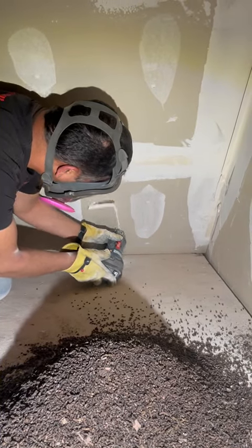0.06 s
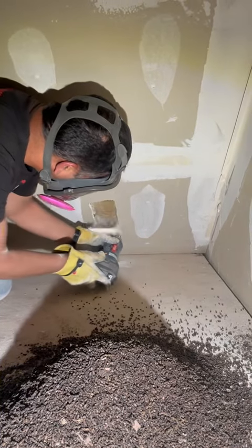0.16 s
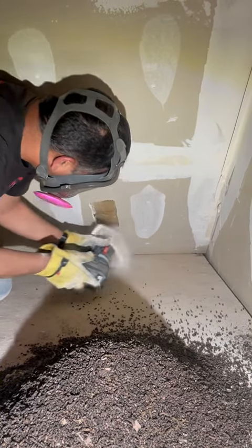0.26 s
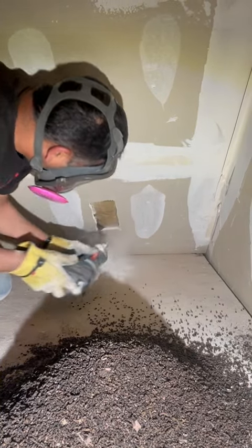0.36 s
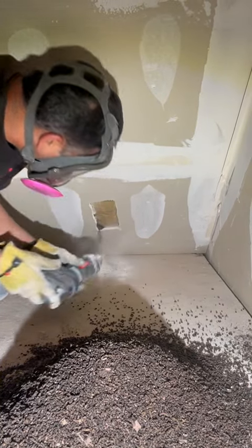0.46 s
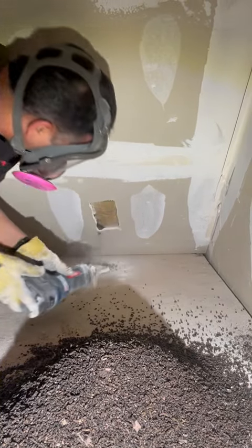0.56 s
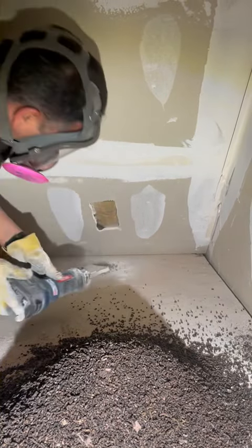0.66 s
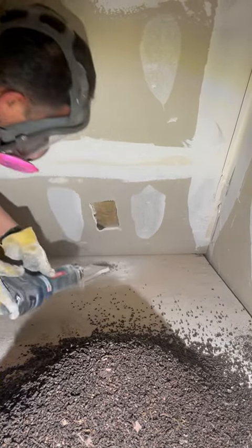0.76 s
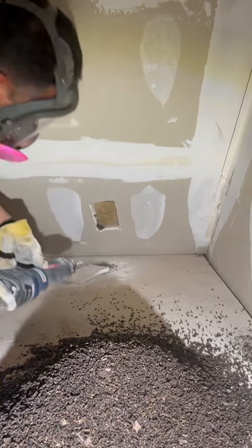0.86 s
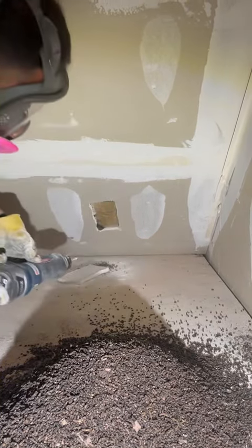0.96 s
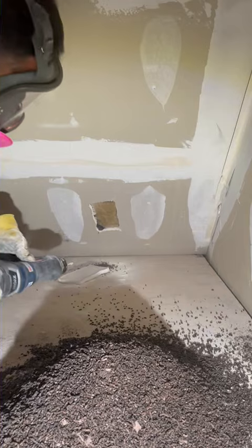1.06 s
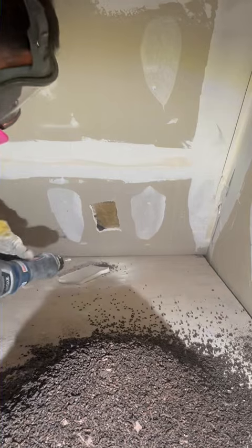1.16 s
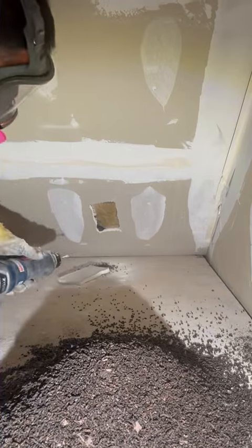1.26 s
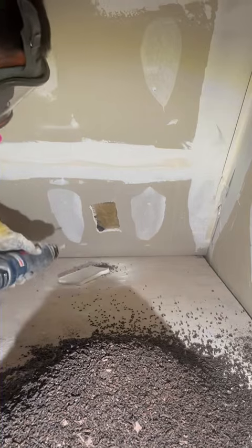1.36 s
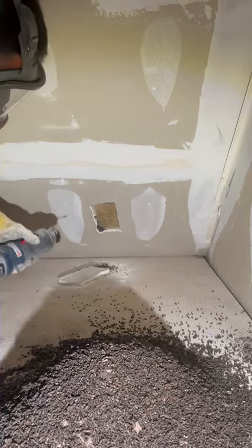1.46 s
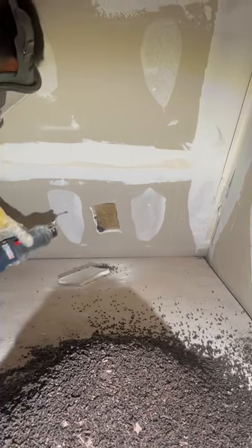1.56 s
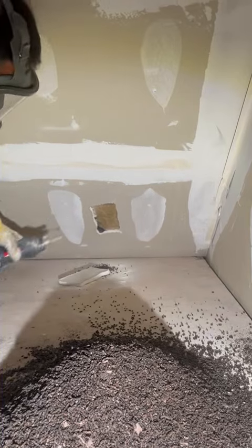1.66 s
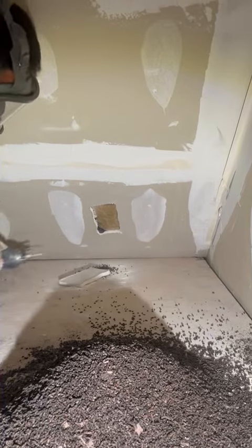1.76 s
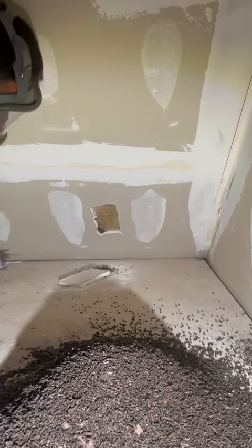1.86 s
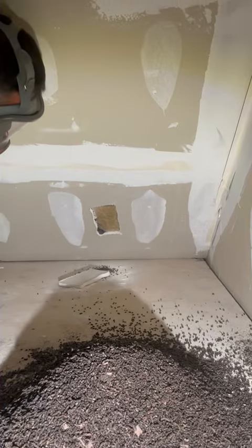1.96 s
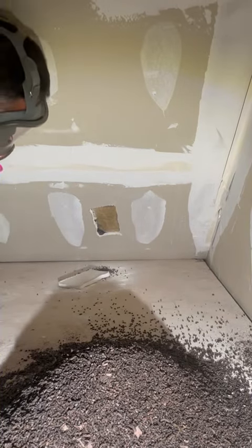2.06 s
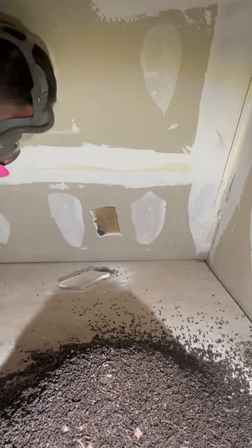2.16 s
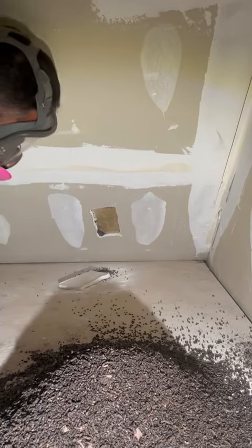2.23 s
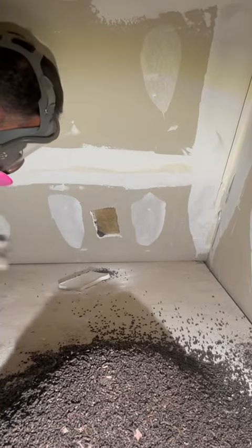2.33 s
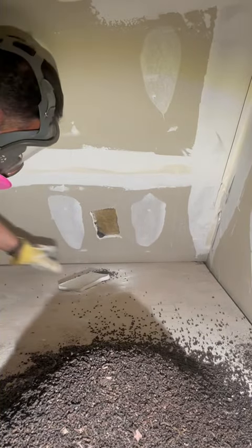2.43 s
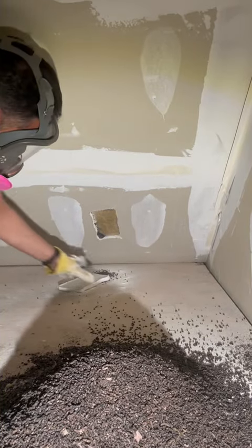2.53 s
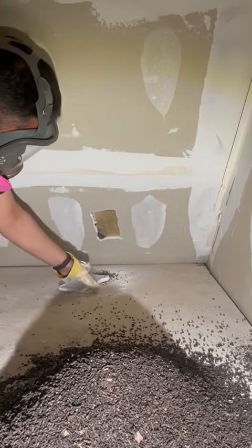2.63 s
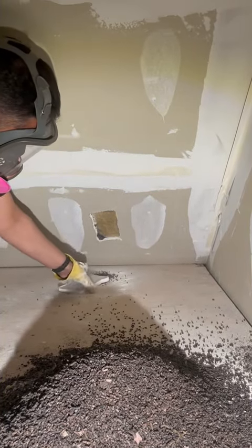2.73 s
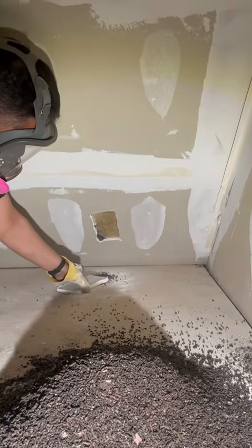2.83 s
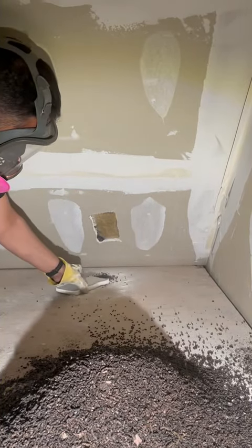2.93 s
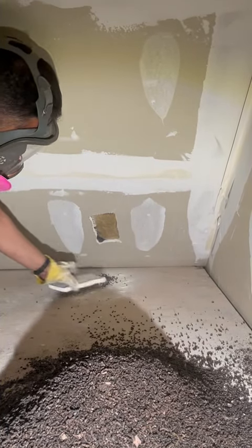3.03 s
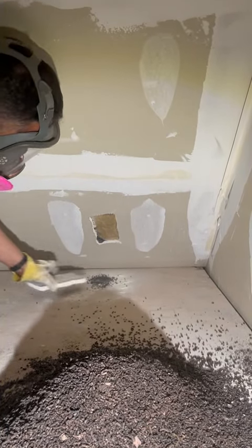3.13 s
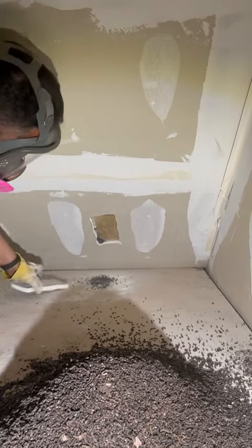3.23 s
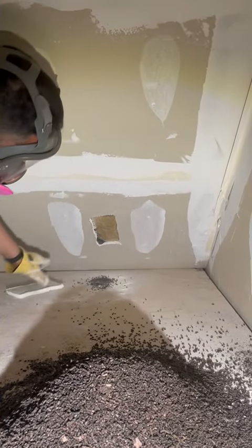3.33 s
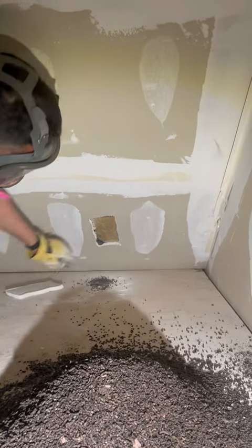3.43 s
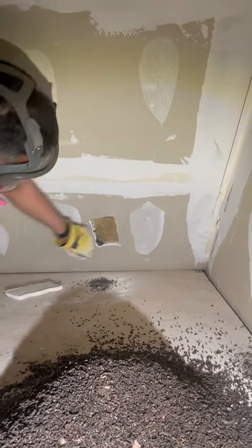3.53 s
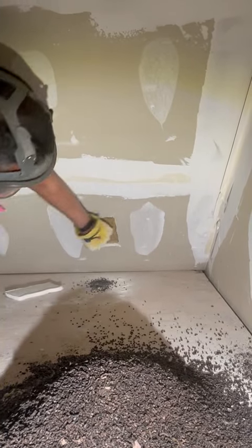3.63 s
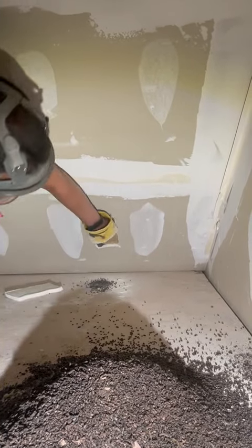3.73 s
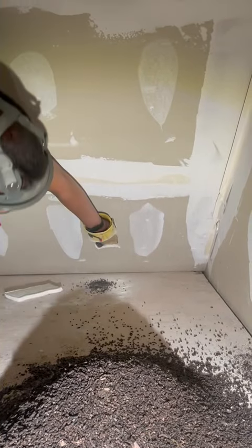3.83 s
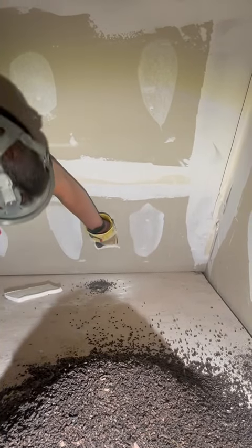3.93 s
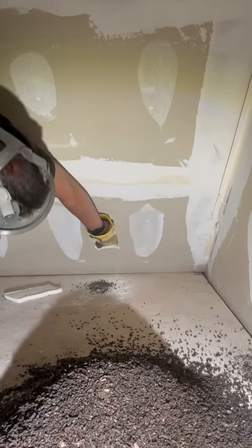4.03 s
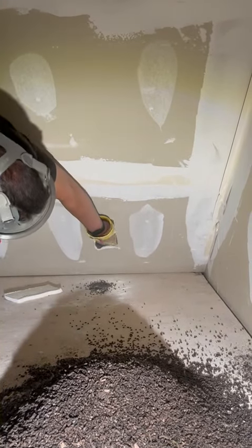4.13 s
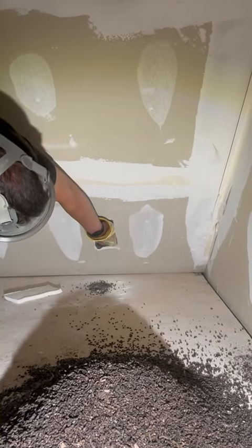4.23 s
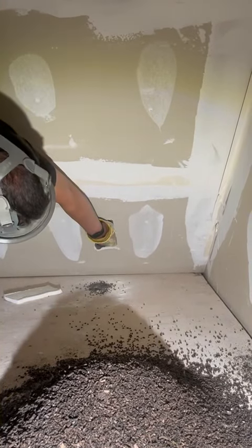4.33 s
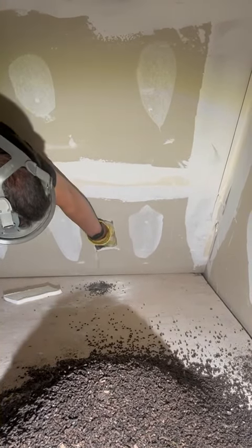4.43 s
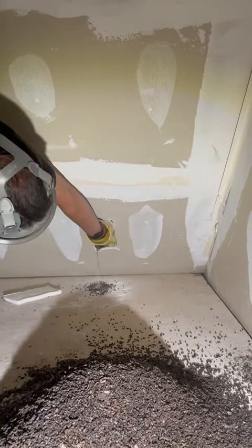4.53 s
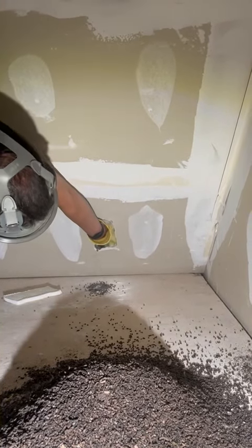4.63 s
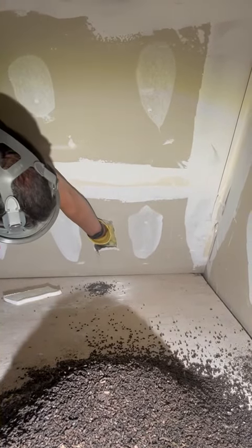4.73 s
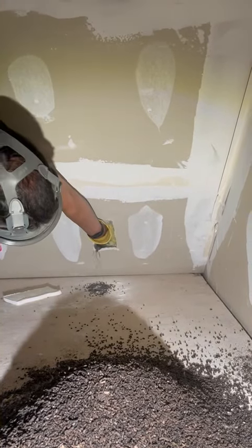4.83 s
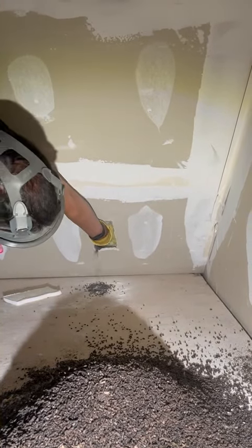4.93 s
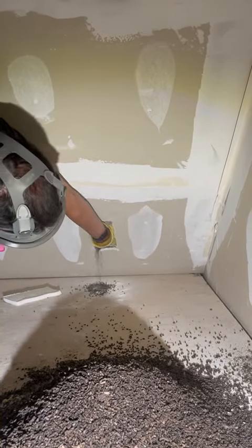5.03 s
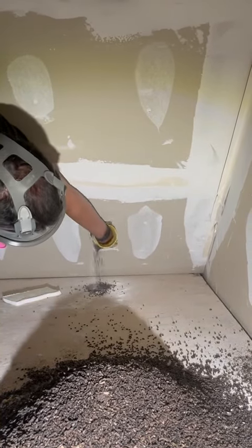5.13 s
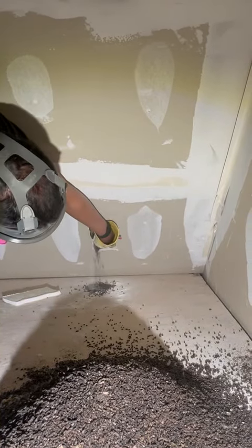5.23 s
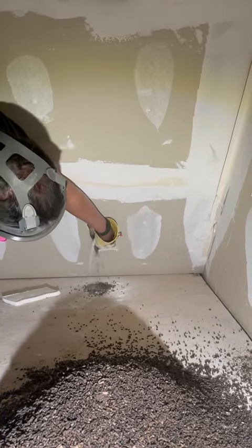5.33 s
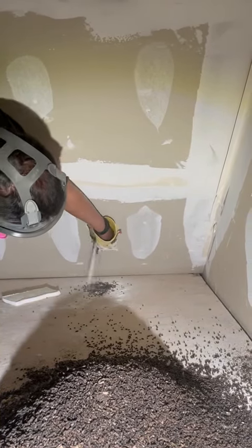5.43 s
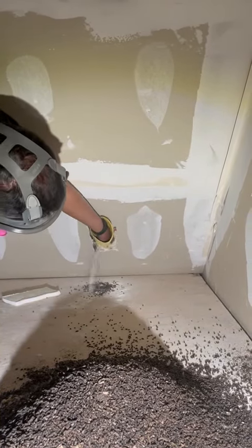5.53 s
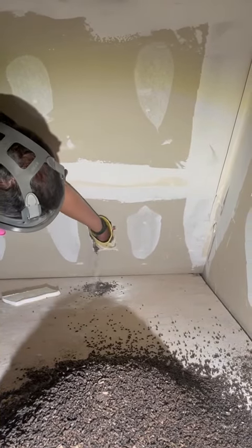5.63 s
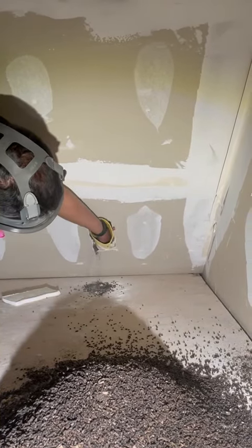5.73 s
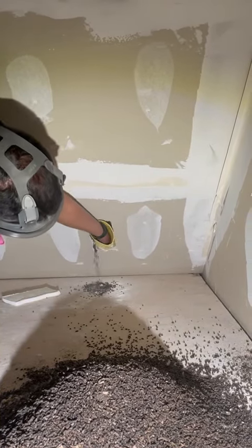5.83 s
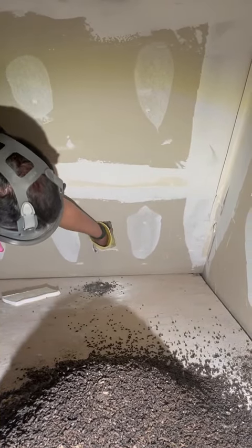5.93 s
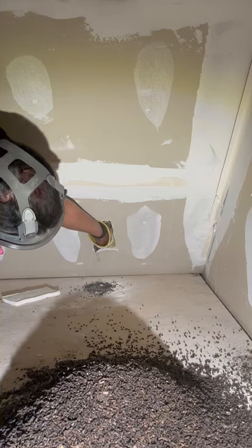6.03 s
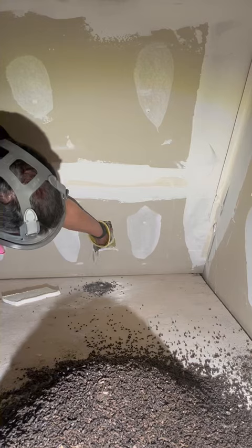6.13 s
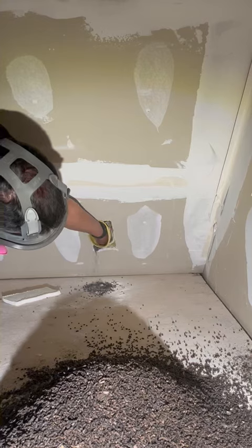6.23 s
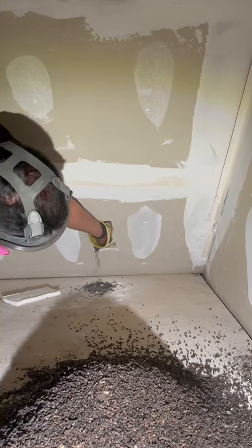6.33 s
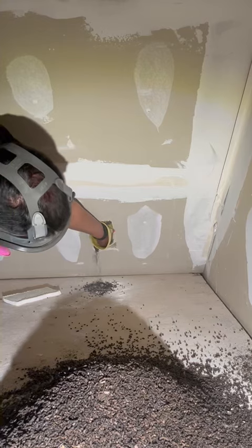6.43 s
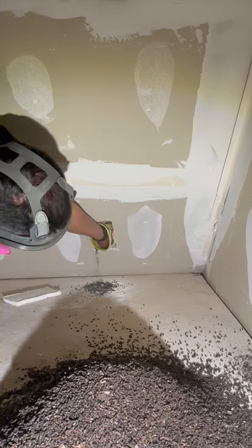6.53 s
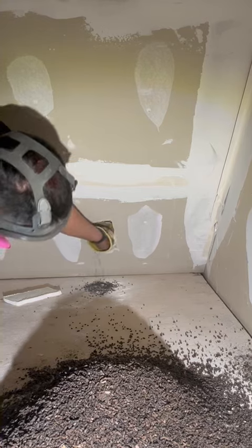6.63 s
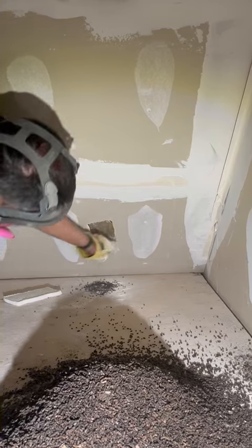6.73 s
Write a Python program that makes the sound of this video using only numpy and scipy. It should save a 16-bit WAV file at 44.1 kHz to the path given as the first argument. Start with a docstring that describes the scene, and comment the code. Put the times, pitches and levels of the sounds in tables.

```python
"""A small high-speed rotary cutter finishes a hole in a plasterboard wall, heard close up in a narrow,
bare room on two microphone ports. Its shaft hums and whines over rushing air; the cut piece drops and
rattles, and the motor coasts down. Tool and piece are knocked about on the hollow floor, setting its
panels ringing. Then a gloved hand rakes loose pellets out of the hole: a rustle of tiny contacts,
a low boom from the panels, and single crumbs ticking as they land."""
import sys
import numpy as np
from scipy import signal
from scipy.fft import rfft, irfft, next_fast_len
from scipy.io import wavfile
from scipy.ndimage import uniform_filter1d

SR = 44100
rng = np.random.default_rng(int(sys.argv[2]) if len(sys.argv) > 2 else 0)


def waveform_to_disk(signal):
    """Save audio, clipped to [-1, 1], as 16-bit WAV at the path in sys.argv[1]."""
    frames = np.transpose(np.atleast_2d(signal))
    scaled = np.clip(frames, -1, 1) * 32767
    samples = np.round(scaled).astype(np.int16)
    wavfile.write(sys.argv[1], SR, samples)


N = 298976

# the shaft runs up, holds, and coasts down once switched off: t/s, turning rate f/Hz
SHAFT_SPEED = [(0.0, 453.4), (0.09, 466.5), (0.2, 473), (0.87, 473), (1.01, 435.0), (1.13, 407.2),
               (1.45, 346.9), (1.93, 263.2), (2.25, 216.6), (2.57, 174.0), (2.77, 152), (3.0, 121),
               (3.2, 96), (3.6, 50)]
# first three shaft tones, swelling and fading as the tool moves about the room:
# t/s, level/dB, left over right/dB, left lead/rad
SHAFT_TONE_1 = [(0.0, -43, 3, .3), (0.14, -35.5, 3, 0), (0.38, -35.5, 2, 0), (0.52, -44.5, 7, -1),
                (0.62, -42, 10, -.4), (0.74, -39.5, 9, -.1), (0.87, -35, 3, .1), (0.98, -40, 6, .3),
                (1.05, -41, 2, -.2), (1.15, -60, 0, -.6), (1.21, -49, 2, -.5), (1.28, -56, 1, 0),
                (1.36, -47, 2, .1), (1.46, -55, 0, -.2), (1.58, -47.5, 1, 0), (1.7, -44.5, 1, 0),
                (1.82, -61, 1, .3), (1.88, -55, 0, .1), (1.96, -61, 0, .3), (2.2, -45, 0, 0),
                (2.3, -40, 0, 0), (2.49, -40, 0, 0)]
SHAFT_TONE_2 = [(0.0, -43, -2, -.2), (0.07, -48, 0, 0), (0.17, -34, 7, 0), (0.22, -36, 4, -.1),
                (0.32, -26.5, 3, -.2), (0.46, -30, 7, -.5), (0.5, -40, 4, -1.4), (0.56, -36, -8, -2.3),
                (0.62, -38, -18, -2.3), (0.68, -32.5, -8, -3.3), (0.82, -31, 0, -2), (0.88, -33, -4, -2),
                (0.97, -50, -2, -2), (1.1, -52, 0, 0), (1.17, -46, 10, -.5), (1.27, -52, 6, .5),
                (1.6, -66, -3, 2.5), (1.75, -53, 9, 1), (1.97, -69, 3, 1.5)]
SHAFT_TONE_3 = [(0.0, -63, 9.6, 2.6), (0.25, -34.5, 3.1, -0.78), (0.441, -43, 4.6, 0.88),
                (0.87, -41, 1.6, 0.11), (1.06, -61.5, 25, -0.024), (1.31, -52, 2, -0.43),
                (1.45, -70, 9, -.4), (1.79, -50, 3.5, -1.3), (1.97, -78, 46, -1.9)]
# what the room holds of each of those tones at switch-off: level/dB
HELD_TONES_DB = [-36, -33, -48]
# whine at 15 times the shaft rate, and its octave: t/s, level/dB
WHINE_LEVEL = [(0.0, -31), (0.07, -40), (0.17, -29), (0.22, -36.5), (0.37, -36), (0.44, -25), (0.55, -30),
               (0.7, -25.5), (0.82, -31), (0.87, -28), (0.96, -42), (1.03, -32), (1.22, -33), (1.28, -38),
               (1.36, -32), (1.48, -41), (1.58, -38), (1.68, -49), (1.75, -45), (1.87, -56), (1.95, -50),
               (2.15, -54), (2.47, -50), (2.6, -57), (2.75, -68), (2.9, -59), (3.02, -63), (3.2, -80)]
WHINE_OCTAVE_LEVEL = [(.8, -66), (0.95, -72), (1.3, -63), (1.8, -60), (2.0, -90), (2.3, -64), (2.5, -64),
                      (2.65, -67), (2.75, -88), (3.0, -88), (3.12, -63), (3.25, -78)]
# the whine's echoes off the near walls: delay t/s, relative level/dB
WALL_ECHOES = [(.013, -15), (.027, -18), (.044, -21), (.067, -24)]
# faint shaft overtones: multiple, base level/dB against the fan roar
OVERTONES = [(4, -13), (5, -16), (6, -24), (7, -21), (8, -22), (9, -21), (10, -24), (11, -24), (12, -24),
             (13, -23), (14, -22), (17, -24), (19, -22), (20, -22), (24, -20), (27, -22)]
# casing resonances: f/Hz, half-width/Hz, lift/dB
CASING_MODES = [(1535, 70, 6), (2300, 150, 4), (3050, 130, 6), (3310, 60, 5)]
# air and friction noise of the motor: t/s, fan roar level/dB, whoosh level/dB, high hiss level/dB
AIR_LEVELS = [(0.0, -42, -41.5, -60.5), (0.2, -39, -39.5, -60), (0.45, -40.5, -40.5, -84),
              (0.76, -43, -37.5, -48), (0.92, -40, -39.5, -47.5), (1.36, -48, -46.5, -51.5),
              (1.68, -45, -48.5, -63.5), (1.9, -48, -52, -57), (2.4, -50, -58, -63), (3.2, -55.5, -61, -52),
              (3.64, -59, -61.5, -52), (3.9, -71, -67.5, -67)]
# spectra of those three noises: f/Hz, relative level/dB
ROAR_SPECTRUM = [(100, -12), (300, -12.5), (600, 0.5), (1100, 5.5), (1700, 3.5), (2400, 4), (3300, -8.5),
                 (5000, -15.5)]
WHOOSH_SPECTRUM = [(1800, -14.5), (3000, 2.5), (4200, 5), (5500, 4), (6800, -1), (8000, -2.5),
                   (11000, -16.5)]
HISS_SPECTRUM = [(5000, -30), (7500, -55.5), (8500, -13.5), (11000, -6), (13500, -22), (15000, -7),
                 (15800, -1.5)]
# the floor's low hum under the tool: t/s, level/dB
FLOOR_HUM = [(0.0, -49), (0.27, -103), (0.44, -37), (0.9, -92), (1.53, -66.5), (1.92, -65), (2.45, -47.5),
             (2.72, -38), (3.02, -45), (3.3, -64)]
# blows on floor and wall: t/s, level/dB, hardness/(dB per octave), relative crack/dB, relative pat/dB
BLOWS = [(0.135, -44.5, 14, -14, 15), (0.299, -13, 0, -24, 6), (0.349, -6.5, 0.5, -1.5, -7.5),
         (0.488, -29.5, 0, 8, 3), (0.561, -28.5, -12, -27, -6), (1.595, -44, -12, -25, -20),
         (2.021, -2, -3.5, -23.5, -16), (2.055, -11.5, -1, -30, -11), (2.18, -38, 10.5, -25, 0),
         (2.513, -6, 3.5, -30, -9), (2.553, -16, 4, -26, -6.5), (2.612, -29.5, 7, -19, -5),
         (2.68, -4.5, -6.5, -31, -23), (2.724, -9.5, 1, -29, -24), (2.753, -12.5, -2.5, -31, -10),
         (2.883, -7.5, -2, -31, -13.5), (2.908, -25, 2.5, -35, 3), (2.959, -32.5, 6, -22, -20),
         (3.196, -12.5, -6.5, -36, -13), (3.252, -22.5, -1.5, -13, 6), (3.35, -54, 6, -15, -8),
         (3.513, -37.5, 3.5, -19, -20), (4.011, -62, 17, -33, 8), (4.05, -37.5, -10, -29, -4),
         (4.257, -57, -16, -23, -14), (4.51, -49.5, 9, -24, 16.5), (4.955, -47.5, 5, -21, -1),
         (5.164, -56, 3, -20, -4), (5.307, -61, 10, -16, 15), (5.417, -58.5, 8, -19, 5),
         (5.571, -56.5, 3.5, -21, 1), (5.849, -55.5, 5, -18.5, 2.5), (6.636, -47, 2.5, -27, 13)]
# modes of the hollow floor and wall: f/Hz, level/dB, T60/s
PANEL_MODES = [(69.1, -5.5, 0.2), (138.3, -1.5, 0.16), (173.5, 10, 0.064), (188.5, -8, 0.11),
               (239, -7, 0.081), (314, -10.5, 0.076), (363.7, -18.5, 0.092), (426, -19, 0.033),
               (482, -18.5, 0.083), (556, -8.5, 0.026), (626, -18.5, 0.065), (828, -16, 0.023),
               (1180, -20.5, 0.021)]
# the cut piece landing: t/s, level/dB
LANDINGS = [(0.354, -19), (0.495, -31)]
# modes of the cut piece: f/Hz, level/dB, T60/s
PIECE_MODES = [(267, -6, .05), (368, 2, 0.069), (423, 1.5, 0.052), (523, -7, .05), (604, 1, 0.041),
               (700, -3, 0.036), (760, -10.5, 0.02)]
# what trickles and shifts between strokes: t/s, then level/dB of rustle, sizzle, deep boom, low boom
TRICKLE_LEVELS = [(3.3, -74, -75, -55, -41), (3.5, -90, -90, -56, -70), (3.75, -56.5, -67.5, -61, -92),
                  (5.2, -64.5, -70.5, -69, -86), (5.75, -68.5, -73.5, -70.5, -91.5),
                  (6.1, -66.5, -70.5, -75, -72), (6.78, -68.5, -73.5, -73.5, -84)]
# strokes of the glove: t/s, hold/s, then level/dB of rustle, sizzle, deep boom, low boom
GLOVE_STROKES = [(3.641, 0.031, -76, -83, -45.5, -64), (3.81, 0.062, -53.5, -61, -43.5, -55.5),
                 (4.058, 0.031, -52.5, -78, -55.5, -76), (4.259, 0.03, -55, -57.5, -71, -56),
                 (4.471, 0.059, -56, -59, -64, -55), (4.59, 0.19, -59.5, -66, -58, -64),
                 (4.956, 0.11, -60.5, -69, -62, -87), (5.09, 0.11, -61, -65.5, -72.5, -87),
                 (5.298, 0.032, -59, -68, -73, -83), (5.529, 0.024, -62, -69, -65, -73.5),
                 (5.866, 0.12, -57, -64.5, -53.5, -61), (6.186, 0.2, -65, -71, -66, -70),
                 (6.543, 0.13, -60, -68, -62, -59)]
# top end of the pellets' sizzle: f/Hz, relative level/dB
SIZZLE_TOP_SPECTRUM = [(4000, -50.5), (7000, -35), (8500, 2), (11000, -6), (13500, -53), (15000, -11),
                       (15800, -4.5)]
# single pellets and crumbs landing: t/s, level/dB, pitch f/Hz, relative treble/dB
CRUMBS = [(3.9155, -35, 2570, -6), (4.0118, -36, 1350, -11), (4.0674, -36, 1350, -5),
          (4.1772, -43, 2600, -9), (4.2195, -48, 5640, -4), (4.2522, -39, 5530, -6), (4.438, -47, 1860, -3),
          (4.463, -42, 2700, -8), (4.469, -40, 2350, -5), (4.474, -39, 2270, -5), (4.667, -49, 1690, -7),
          (4.752, -46, 2540, -5), (4.955, -52, 1890, -8), (5.0571, -44, 3930, -8), (5.108, -50, 3900, -8),
          (5.168, -44, 4020, -9), (5.3082, -43, 1060, -10), (5.385, -53, 4060, -8),
          (5.4183, -43, 1480, -10), (5.571, -52, 2610, -4), (5.712, -54, 5140, -9),
          (5.8505, -37, 2260, -11), (5.8865, -38, 3940, -8), (5.9125, -48, 4500, -3),
          (5.9335, -47, 5000, -2), (5.946, -48, 5000, -2), (5.964, -39, 3340, -6), (5.974, -43, 3030, -6),
          (6.245, -52, 4500, -8), (6.2881, -48, 4200, -4), (6.326, -50, 2150, -8), (6.538, -49, 1300, -9),
          (6.63, -50, 2600, -8), (6.6769, -44, 1260, -8), (6.692, -49, 1650, -9)]
# how alike the room sounds at the two ports: f/Hz, likeness from 0 to 1
PORT_LIKENESS = [(100, 1), (350, .97), (700, .8), (1100, .55), (2000, .88), (3300, .45), (4000, .72),
                 (5200, .85), (6500, .85), (7300, 1), (8400, 1), (9300, .65), (10500, 1), (12000, 1),
                 (12600, .6), (13700, 1), (14900, 1), (15600, .8)]
# phase between the two ports: f/Hz, left lead/rad
PORT_PHASE = [(2000, 0), (2800, .2), (3500, 1.4), (4200, 1.3), (4800, -.2), (5500, .4), (6200, 1.5),
              (7100, 2.65), (7600, 3.14), (8400, 3.14), (10200, 6.1), (11700, 6.35), (12400, 7),
              (13100, 9.1), (13700, 9.42), (14700, 9.42), (15800, 10.3)]

SWITCH_OFF_S, ROOM_T60_S = .87, 0.48
TIME = np.arange(N) / SR
COASTING = TIME > SWITCH_OFF_S
SIDES = np.array([[.5], [-.5]])   # splits a difference between left and right


def from_db(db):
    """Gain of a level."""
    return 10 ** (np.asarray(db) / 20)


def rms_one(x):
    """Scaled to unit power."""
    return x / np.sqrt(np.mean(x ** 2) + 1e-20)


def in_time(rows, fade_s=0.13):
    """Columns at every sample, and a gate that is open while the table lasts."""
    s, *columns = np.transpose(rows)
    gate = np.clip(np.minimum(TIME - s[0], s[-1] - TIME) / fade_s + 1, 0, 1)
    return [np.interp(TIME, s, c) for c in columns] + [gate]


def at_hz(points, hz):
    """A spectrum read on a log-frequency axis."""
    points_hz, values = np.transpose(points)
    return np.interp(np.log(np.maximum(hz, 10)), np.log(points_hz), values)


def drift(hz):
    """A slow random wander of spread 1."""
    r = np.exp(-80 * np.pi * hz / SR)
    slow = signal.lfilter([1], [1, -2 * r, r * r], rng.standard_normal(N // 40 + 2002))[2000:]
    return np.interp(np.arange(N) / 40, np.arange(len(slow)), rms_one(slow))


def ring(clicks, hz, t60):
    """A unit click sets a sine of height 1 ringing."""
    r, w = from_db(-60 / (t60 * SR)), 2 * np.pi * hz / SR
    return signal.lfilter([0, np.sin(w)], [1, -2 * r * np.cos(w), r * r], clicks + 1e-18)


def band(x, hz, kind):
    """A gentle low-, high- or band-pass."""
    return signal.sosfilt(signal.butter(2, hz, kind, fs=SR, output="sos"), x)


def at_ports(mid, side, hz):
    """Two spectra mixed into left and right, as alike as the ports hear the room."""
    alike = np.clip(at_hz(PORT_LIKENESS, hz), 0, 1)
    return np.sqrt(1 + alike) * mid + np.sqrt(1 - alike) * side * [[1], [-1]]


def coloured(spectrum, source=None, ripple_db=3.5):
    """Stereo noise of unit power, shaped to a spectrum and rippled by the room's standing waves."""
    size = next_fast_len(N)
    mid, side = rfft(rng.standard_normal((2, N)) if source is None else source, size)
    hz = np.arange(len(mid)) * SR / size
    ripple = np.interp(hz, np.arange(800) * 28.0, rng.standard_normal(800)) * (hz > 500)
    shape = from_db(at_hz(spectrum, hz) + ripple_db * ripple)
    return rms_one(irfft(at_ports(mid, side, hz) * shape, size)[:, :N])


def tone(phase, db, pan_db=0, lead=0):
    """A stereo sine around an rms level; pan and lead favour the left."""
    return np.sqrt(2) * from_db(db + SIDES * pan_db) * np.sin(phase + SIDES * lead)


def shaft_tones(turn, top_hz):
    """The shaft's first three tones flicker as they fall through the room's standing waves."""
    since_off = TIME - SWITCH_OFF_S
    out = np.zeros((2, N))
    for order, rows in enumerate((SHAFT_TONE_1, SHAFT_TONE_2, SHAFT_TONE_3), 1):
        db, pan_db, lead, gate = in_time(rows)
        flicker_db = uniform_filter1d(COASTING * 2.0 * drift(hz=9.7), size=400)
        out += gate * tone(order * turn, db + flicker_db, pan_db, lead)
        # the room holds the full-speed pitch for a moment after switch-off
        held_db = HELD_TONES_DB[order - 1] - 60 * np.abs(since_off) / ROOM_T60_S
        out += np.clip(since_off / .03, 0, 1) * tone(order * 2 * np.pi * top_hz * since_off, held_db)
    return out


def whine(turn):
    """Fan blades or armature slots whine; short echoes make the high tones flutter and blur."""
    out = np.zeros((2, N))
    for order, rows in ((15, WHINE_LEVEL), (30, WHINE_OCTAVE_LEVEL)):
        db, gate = in_time(rows)
        waver = np.where(COASTING, .4, .45) * drift(hz=30)
        flutter_db = np.where(COASTING, 3.5, 1.5) * drift(hz=34)
        pan_db = .5 + COASTING * 2.5 * drift(hz=9.3)
        direct = gate * tone(order * turn + waver, db + flutter_db, pan_db)
        out += direct
        for lag_s, echo_db in WALL_ECHOES:
            lag = round(lag_s * SR)
            out[:, lag:] += from_db(echo_db) * direct[:, :-lag]
    return out


def casing_overtones(turn, speed, top_hz=6500):
    """Faint shaft multiples: the casing lifts those passing its resonances and holds back the highest."""
    roar_db, _, _, running = in_time(AIR_LEVELS)
    outlast_db = -.8 * np.log2(speed / speed.max())   # they fade more slowly than the fan roar
    out = np.zeros((2, N))
    for order, db in OVERTONES:
        hz = order * speed
        casing_db = sum(lift / (1 + ((hz - centre) / width) ** 2) for centre, width, lift in CASING_MODES)
        casing_db -= 6 * (hz / top_hz) ** 4
        level_db = roar_db + casing_db + outlast_db + db + 4 * drift(hz=8)
        out += running * tone(order * turn + .9 * drift(hz=22), level_db, pan_db=4 * drift(hz=3))
    return out


def motor_air(rasp_db=2.6):
    """Fan roar, whoosh and a thin high hiss rasp unevenly: each narrow band swells and dips on its own."""
    roar_db, whoosh_db, hiss_db, running = in_time(AIR_LEVELS)
    roar = from_db(roar_db) * coloured(ROAR_SPECTRUM)
    whoosh = from_db(whoosh_db) * coloured(WHOOSH_SPECTRUM)
    hiss = from_db(hiss_db) * coloured(HISS_SPECTRUM)
    bands = signal.stft(roar + whoosh + hiss, nperseg=512)[2]
    patches = uniform_filter1d(rng.standard_normal(bands.shape[1:]), size=4, axis=0)
    patches = rms_one(uniform_filter1d(patches, size=5, axis=1))
    return running * signal.istft(bands * from_db(rasp_db * patches), nperseg=512)[1][:, :N]


def cutter():
    """The motor, close up: tones locked to one turning shaft, over its air noise."""
    speed = in_time(SHAFT_SPEED)[0]
    turn = 2 * np.pi * np.cumsum(speed) / SR
    return shaft_tones(turn, speed.max()) + whine(turn) + casing_overtones(turn, speed) + motor_air()


def panel_boom(deep_gain, low_gain):
    """Lumpy low noise in the floor and wall panels, first under the tool, then under the glove."""
    hum_db, humming = in_time(FLOOR_HUM)
    deep = coloured([(25, -45.5), (45, 8.5), (70, 13.0), (120, 9.0), (200, -44.0)])
    low = coloured([(80, -6), (150, 12.5), (300, 2.0), (480, 3.0), (800, -41.0)])
    lumps = from_db(3 * drift(hz=12))
    return deep * (deep_gain + humming * from_db(hum_db)) + low * lumps * low_gain


def knocks(crack_t60_s=0.014, swell_s=0.011):
    """Each blow gives a short pat and a crack, and sets every panel mode swelling with its own strength."""
    out, size = np.zeros(N), SR // 2
    t = np.arange(size) / SR
    spread_db = rng.normal(0, 3.0, (len(BLOWS), len(PANEL_MODES)))
    bursts = rng.standard_normal((len(BLOWS), size)) * from_db(-60 * t / crack_t60_s)
    cracks = band(bursts, [500, 3000], "band")
    push = np.zeros(size)
    push[:30] = np.hanning(30) / 15   # a soft contact
    pat = -ring(np.roll(push, 150), hz=230, t60=.028)   # the struck spot itself, quickly dead
    # neighbouring modes start in opposite directions
    modes = np.array([(-1) ** k * ring(push, hz, t60) for k, (hz, _, t60) in enumerate(PANEL_MODES)])
    mode_hz, mode_db, _ = np.transpose(PANEL_MODES)
    ratio = mode_hz / 185
    for (s, db, hardness, crack_db, pat_db), own_db, crack in zip(BLOWS, spread_db, cracks):
        # hard contacts reach the high modes
        strengths = from_db(mode_db + own_db + hardness * np.maximum(np.log2(ratio), 0))
        # low modes take a moment to move, longer when hit softly
        swell_rates = ratio * from_db(max(hardness, 0) / 2) / swell_s
        swell = (1 - np.exp(-np.outer(swell_rates, t))) ** 2
        body = from_db(-3.5) * strengths @ (swell * modes)
        blow = body + from_db(crack_db) * crack + from_db(pat_db) * pat
        at = round(s * SR)
        out[at:at + size] += from_db(db) * blow[:N - at]
    return out


def falling_piece(rattle_per_s=150, rattle_t60_s=0.34, rattle_db=-6):
    """Each landing strikes the plasterboard's modes, then small uneven contacts die away."""
    size = SR   # the first second holds it all
    t = np.arange(size) / SR
    touches = (rng.random(size) < rattle_per_s / SR) * from_db(rattle_db)
    clicks = np.zeros(size)
    for s, db in LANDINGS:
        contacts = touches * (t > s)
        contacts[round(s * SR)] += 1
        clicks += from_db(db - 60 * np.abs(t - s) / rattle_t60_s) * contacts
    chance = rng.uniform(-1, 1, (len(PIECE_MODES), size))
    strikes = clicks * np.sign(chance) * (.5 + .5 * abs(chance))
    board = sum(from_db(db) * ring(own, hz, t60) for (hz, db, t60), own in zip(PIECE_MODES, strikes))
    return np.pad(board, (0, N - size))


def glove_gains(rise_db_per_s=296, fall_db_per_s=128):
    """Rustle, sizzle, deep and low boom under the hand: each stroke rises, holds, sinks into the trickle."""
    *levels_db, gate = in_time(TRICKLE_LEVELS)
    for s, hold_s, *peaks_db in GLOVE_STROKES:
        before_db = rise_db_per_s * np.maximum(s - TIME, 0)
        after_db = fall_db_per_s * np.maximum(TIME - s - hold_s, 0)
        levels_db = np.maximum(levels_db, np.array(peaks_db)[:, None] - before_db - after_db)
    return gate * from_db(levels_db)


def pellets(rustle_gain, sizzle_gain, base_per_s=1200, spread_db=1.8):
    """Dense tiny contacts of uneven size, in clumps; the level follows the hand."""
    sizes = from_db(spread_db * np.minimum(rng.exponential(1, (2, N)), 5)) * rng.choice([-1, 1], (2, N))
    contacts = rng.random((2, N)) < base_per_s * from_db(5 * drift(hz=25)) / SR
    grains = sizes * contacts + 0.12 * rng.standard_normal((2, N))
    dull = coloured([(300, 12.5), (600, 1.5), (1100, 1.5), (2400, -0.5), (3400, -23), (5000, -58)], grains)
    bright = coloured([(1800, -10), (3000, 10.5), (4200, 11.5), (5500, 9), (6800, 3), (8500, -3.5)], grains)
    top = from_db(-16.5) * coloured(SIZZLE_TOP_SPECTRUM, grains)
    return rustle_gain * dull + sizzle_gain * (bright + top)


def crumb_ticks(click_t60_s=.011, dust_t60_s=.024, dust_db=-20):
    """Each crumb is a short broad click, a little stronger near its own pitch, then dust scatters."""
    out, size = np.zeros(N), 3000
    t = np.arange(size) / SR
    decay = from_db(-60 * t / click_t60_s) + from_db(dust_db - 60 * t / dust_t60_s)
    for (s, db, hz, treble_db), chance in zip(CRUMBS, rng.uniform(-1, 1, (len(CRUMBS), size))):
        grit = np.sign(chance) * (.6 + .4 * abs(chance)) * decay
        click = signal.lfilter([.3, 0, -.3], [1, -.9, .3], grit)   # a broad band-pass
        click = band(click, 7000, "low") - from_db(treble_db) * band(click, 7000, "high")
        tick = click + .18 * ring(click, hz, t60=.004)
        at = round(s * SR)
        out[at:at + size] += from_db(db) * tick[:N - at]
    return out


def room(x, wall_cut_hz=3200):
    """Sound bounces between the close, bare walls: sixteen echo loops, duller on every round."""
    size = next_fast_len(N + SR)
    hz = np.arange(size // 2 + 1) * SR / size
    w = 2 * np.pi * hz / SR
    pole = np.exp(-2 * np.pi * wall_cut_hz / SR)
    wall = (1 - pole) / (1 - pole * np.exp(-1j * w))
    echoes = np.zeros((2, len(w)), complex)
    for k, lag_s in enumerate(np.geomspace(.009, .031, 16)):
        loop = from_db(-60 * lag_s / ROOM_T60_S) * wall * np.exp(-1j * w * lag_s * SR)
        echoes[k % 2] += loop / (1 - loop) * (-1) ** (k // 2)
    return irfft(at_ports(*echoes, hz) * rfft(x, size), size)[:, :N]


def scene():
    """Everything as it reaches the microphone; blows and crumbs also sound through the room."""
    blows = knocks() + falling_piece()
    crumbs = crumb_ticks()
    rustle, sizzle, deep, low = glove_gains()
    reverb = room(from_db(-21) * blows + from_db(-41) * crumbs)
    panned_crumbs = crumbs * from_db(4 * SIDES)   # a little to the left
    return cutter() + panel_boom(deep, low) + pellets(rustle, sizzle) + blows + panned_crumbs + reverb


def record(dry, bass_cut_hz=42, top_cut_hz=15800):
    """The two close microphone ports shift the treble in phase; deep bass and the top are cut."""
    size = next_fast_len(N + 2000)
    lead = at_hz(PORT_PHASE, np.arange(size // 2 + 1) * SR / size)
    shifted = irfft(rfft(dry, size) * np.exp(1j * SIDES * lead), size)[:, :N]
    top_cut = signal.ellip(12, .5, 80, top_cut_hz, fs=SR, output="sos")
    return signal.sosfilt(top_cut, band(shifted, bass_cut_hz, "high"))


dry = scene()
out = record(dry)
waveform_to_disk(out)
```